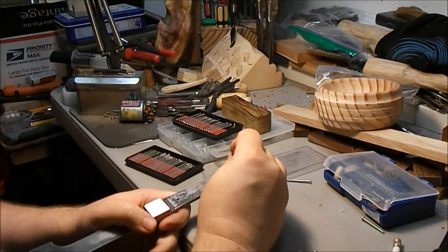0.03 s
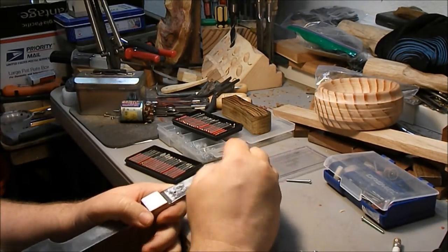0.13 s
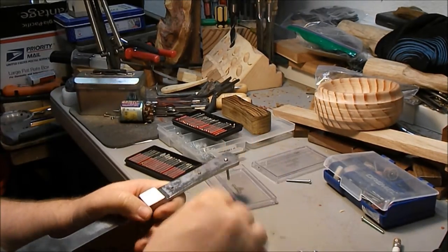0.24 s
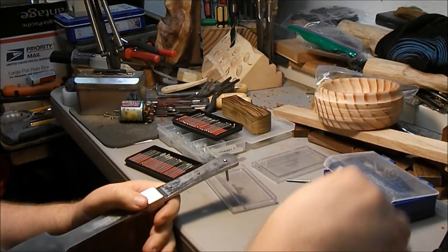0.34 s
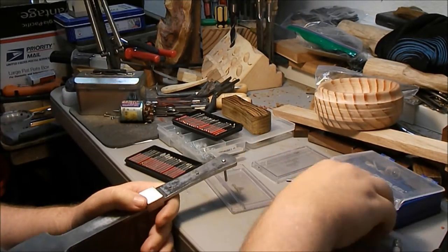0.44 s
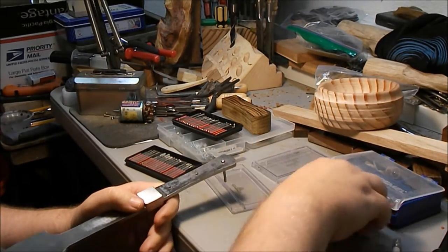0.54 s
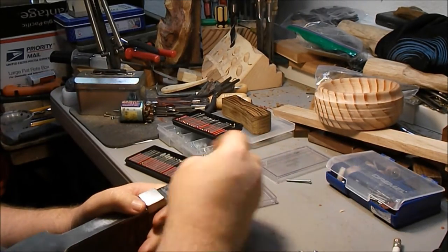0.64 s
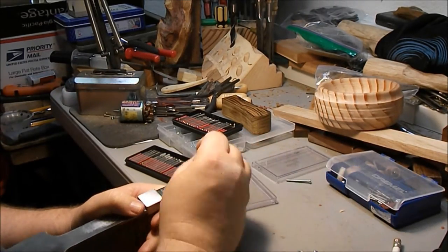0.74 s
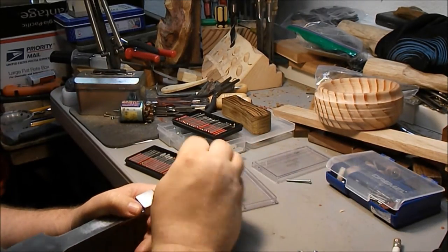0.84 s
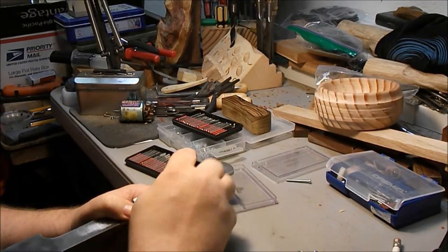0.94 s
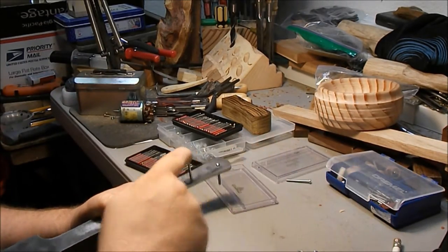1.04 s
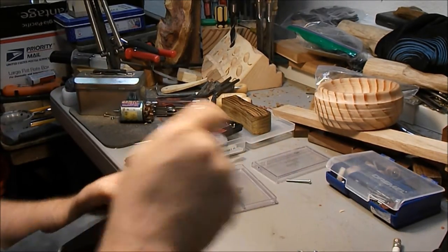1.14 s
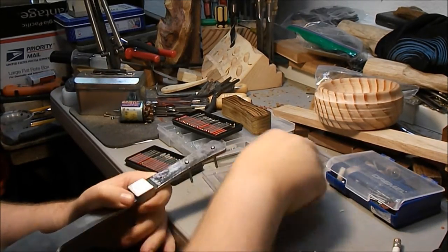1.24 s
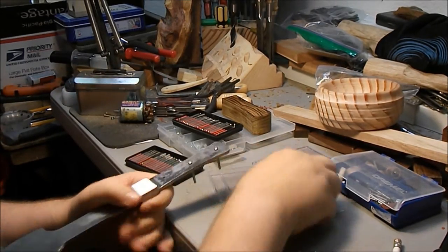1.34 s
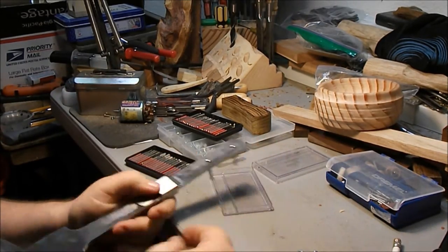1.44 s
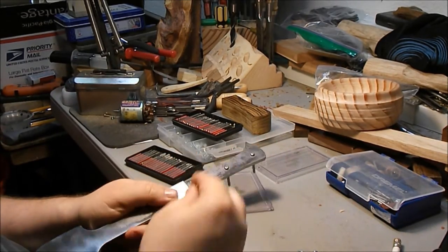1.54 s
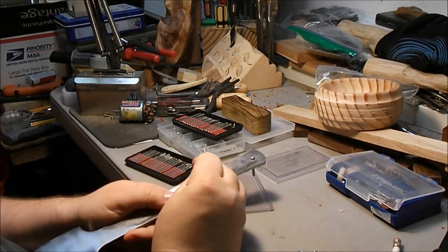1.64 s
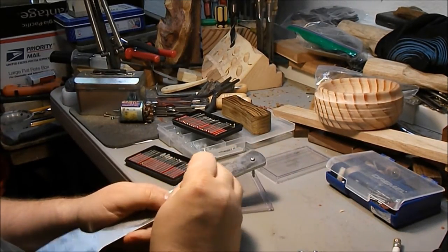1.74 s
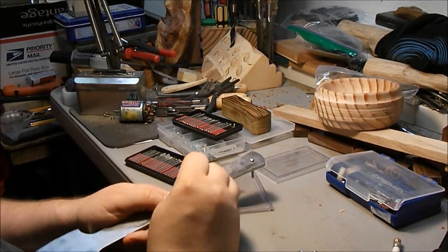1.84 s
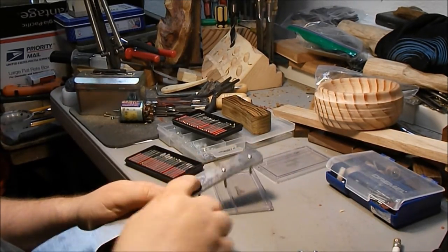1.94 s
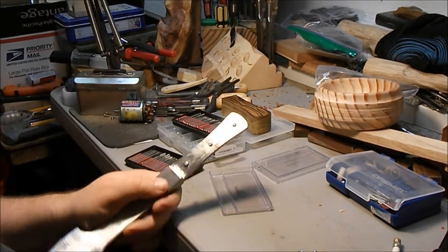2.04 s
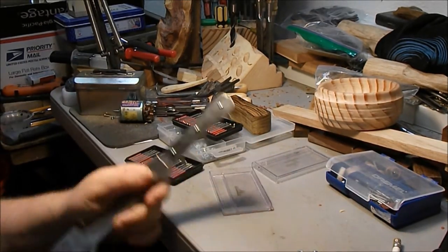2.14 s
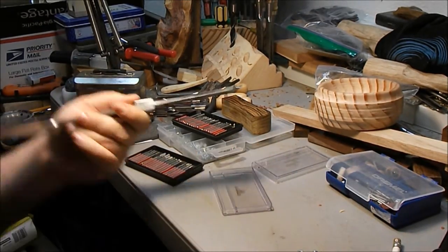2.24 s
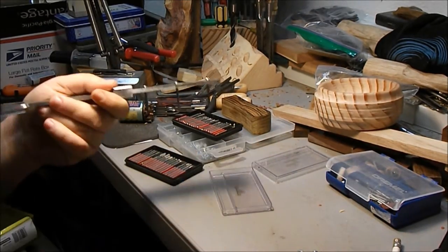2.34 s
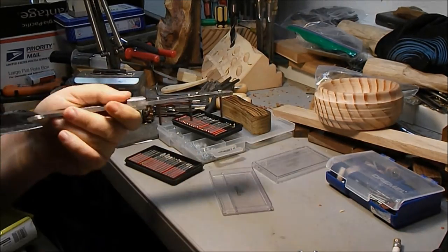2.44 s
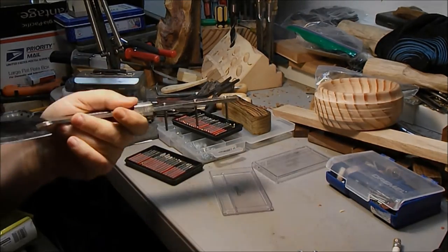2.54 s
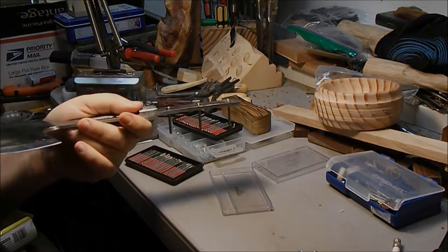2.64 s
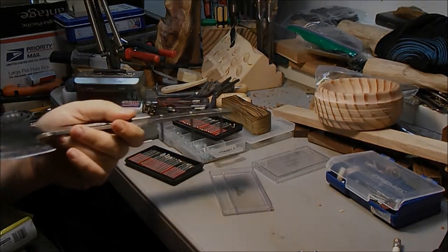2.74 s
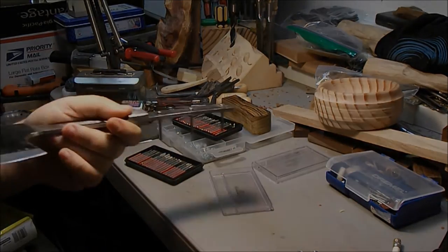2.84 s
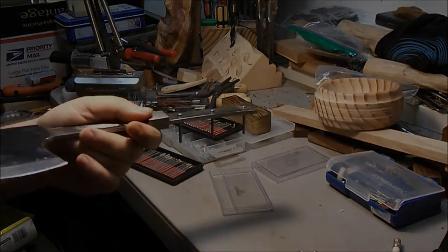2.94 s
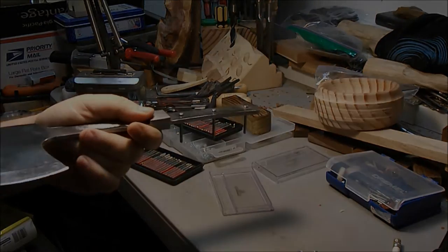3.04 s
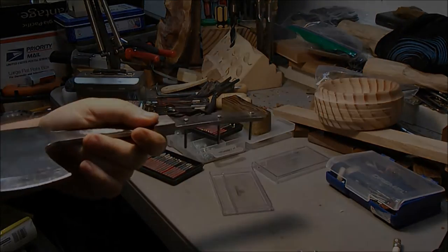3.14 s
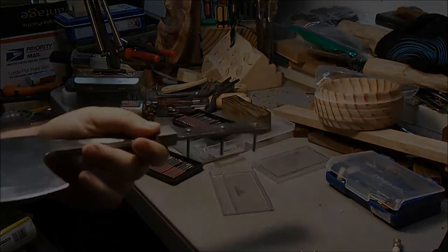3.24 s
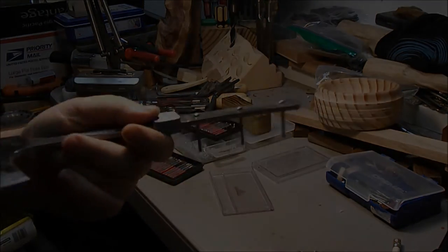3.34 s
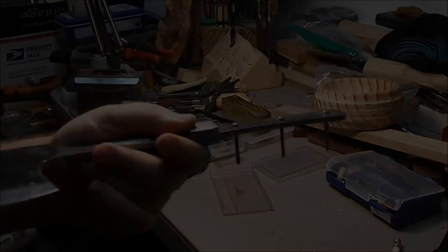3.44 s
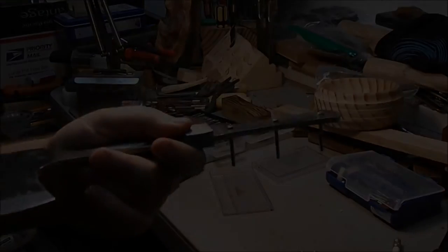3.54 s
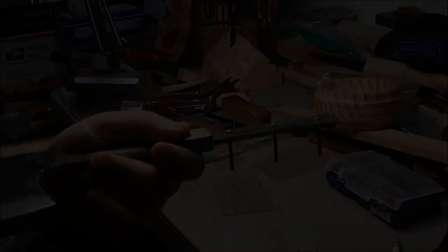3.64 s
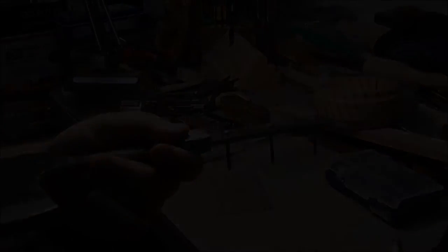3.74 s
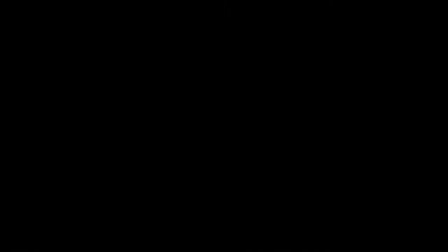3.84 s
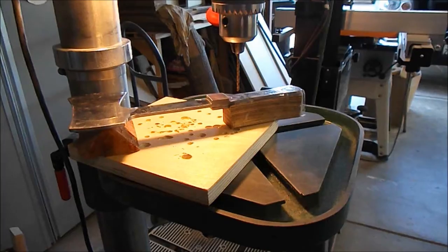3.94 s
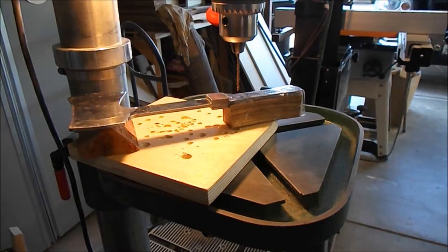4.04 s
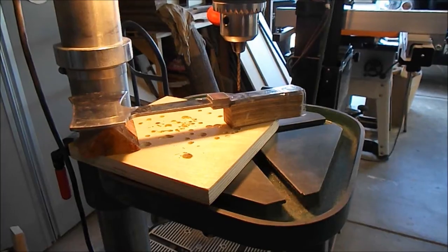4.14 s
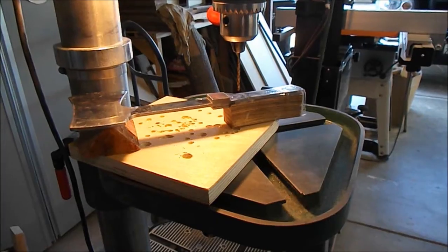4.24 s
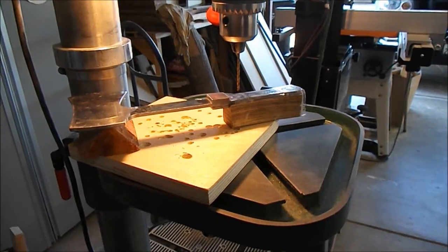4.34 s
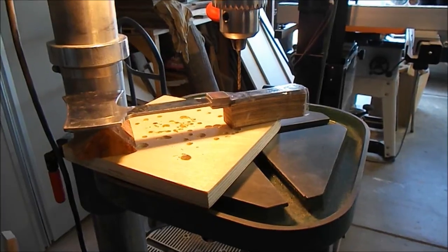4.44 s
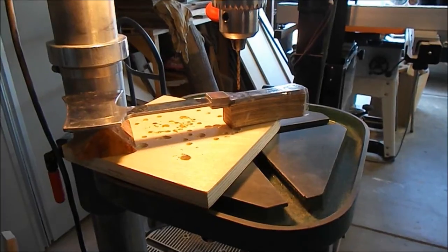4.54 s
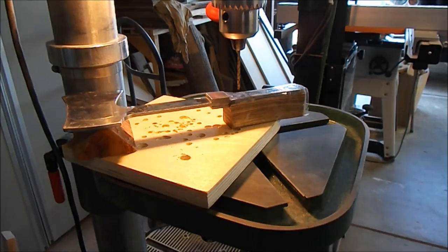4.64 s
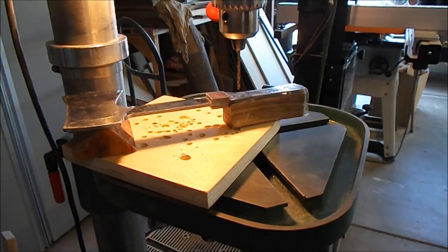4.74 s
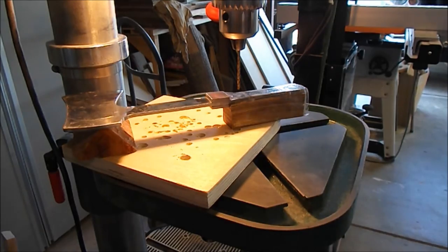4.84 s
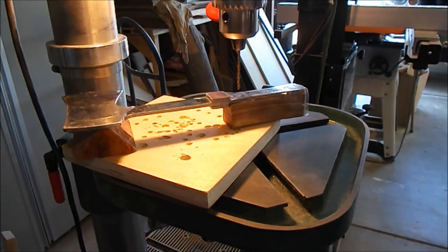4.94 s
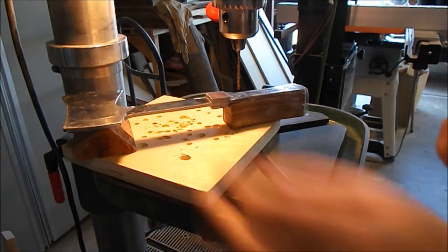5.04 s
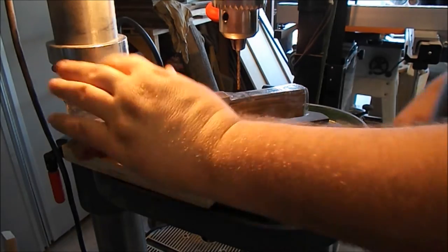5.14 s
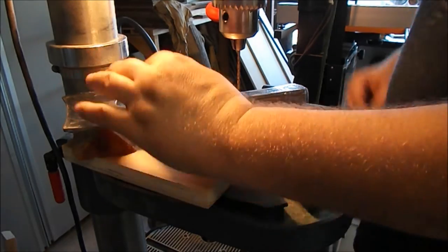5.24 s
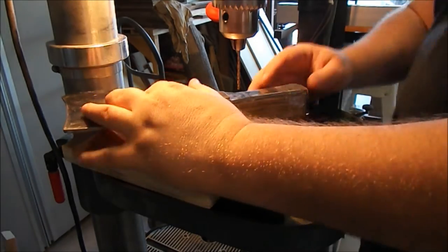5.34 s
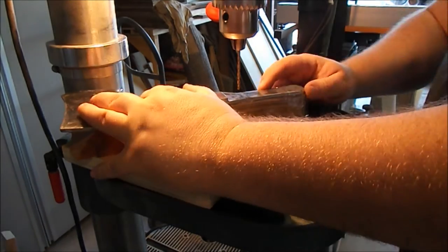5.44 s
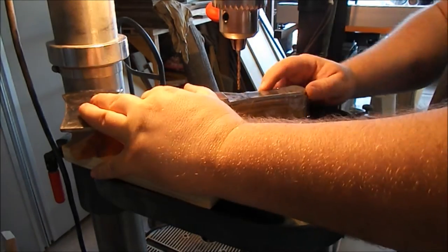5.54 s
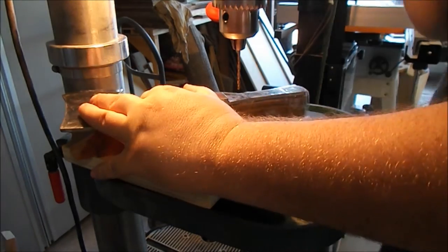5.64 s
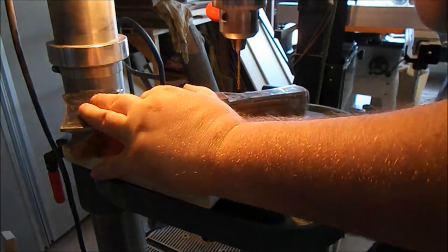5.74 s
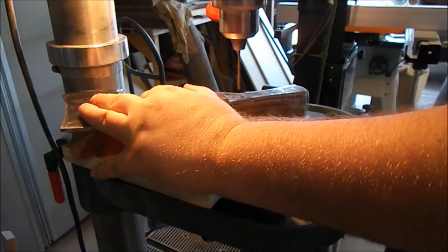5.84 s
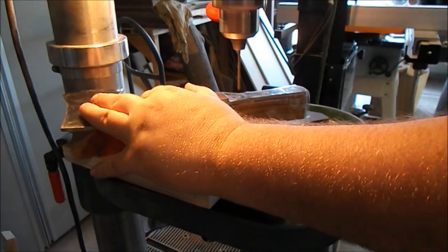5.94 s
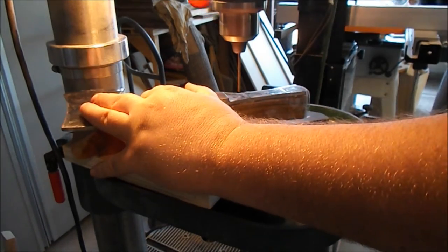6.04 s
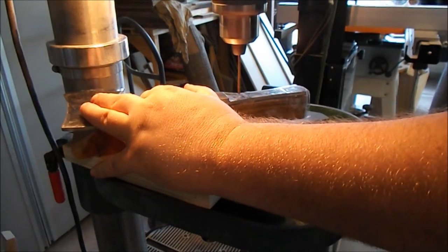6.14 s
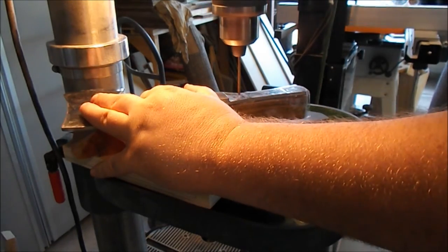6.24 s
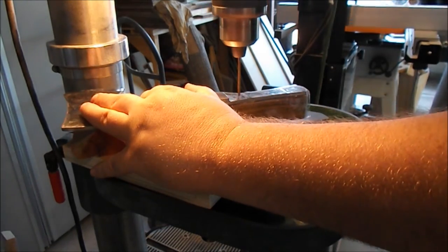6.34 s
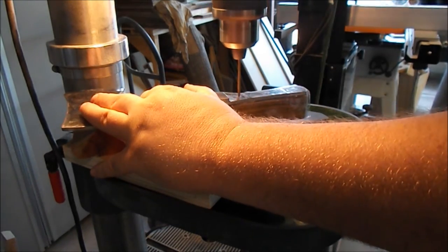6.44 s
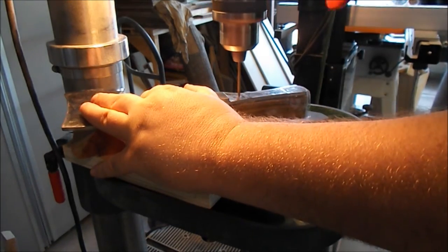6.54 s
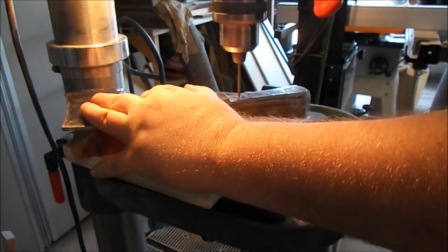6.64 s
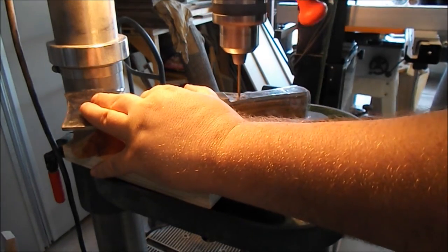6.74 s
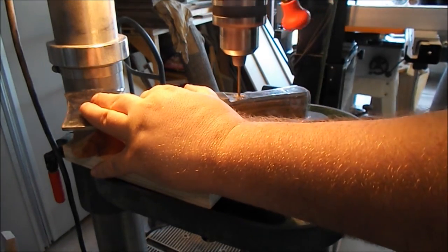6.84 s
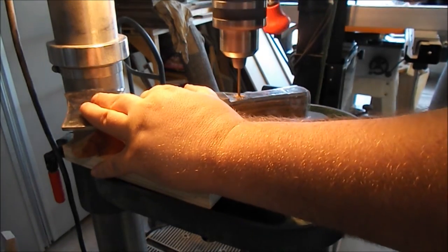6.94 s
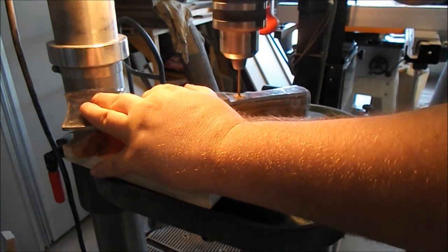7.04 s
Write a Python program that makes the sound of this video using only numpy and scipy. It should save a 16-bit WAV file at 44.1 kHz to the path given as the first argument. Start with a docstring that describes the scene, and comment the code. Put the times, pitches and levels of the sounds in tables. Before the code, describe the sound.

Close, dry metal ticks, scrapes and bright screw jingles, soft handling, then a drill press starts with a clunk and gritty cutting.

```python
"""Bench handling and a drill press

In a home workshop, small screws jingle in the holes of a steel knife tang and a hand scrapes for more: noisy
contacts excite decaying steel modes, and coloured noise makes scrapes, soft bands, ticks and knocks.
At a drill press, ticks and a clink precede the switch: motor lines hum and whine, modulated noise makes belt
and spindle rattle, and gritty pulsed noise is the thin bit cutting metal. Hiss and a small room lie behind.
"""
import sys
import numpy as np
from scipy import signal
from scipy.fft import rfft, irfft, next_fast_len
from scipy.io import wavfile
from scipy.ndimage import map_coordinates

SR = 44100
rng = np.random.default_rng(int(sys.argv[2]) if len(sys.argv) > 2 else 0)


def master(y):
    """Save y as 16-bit WAV."""
    cut = np.clip(np.atleast_2d(y).T, -1, 1)
    pcm = np.round(cut * 32767)  # scale
    wavfile.write(sys.argv[1], SR, pcm.astype(np.int16))


N = 312669

# Spectrum of belt and spindle rattle: (frequency [Hz], relative level [dB])
RATTLE_SPECTRUM = [(150, -62), (300, -70), (450, -31), (650, -30.5), (800, -20), (1150, -8.5), (1350, -9),
                   (1570, -9.5), (1800, -7), (2250, -7.5), (2700, -3.5), (3600, -0.5), (5000, -4),
                   (9000, -20.5)]
# Spectrum of belt hiss: (frequency [Hz], relative level [dB])
BELT_SPECTRUM = [(400, -68), (3000, -22), (6000, 8), (7100, 3), (8200, 7.5), (9200, 5.5), (10000, 2),
                 (12500, 4), (15000, 3.5), (16500, -14)]
# Resonances of the sheet-metal guard and casting: (frequency [Hz], width [Hz], rms level [dB])
GUARD_RESONANCES = [(800, 48, -68), (893, 45, -66), (1079, 42, -54.5), (1950, 190, -53.5),
                    (3150, 225, -47.5), (3510, 255, -50), (4340, 80, -56), (5620, 48, -57), (9065, 96, -56)]
# The guard sings out as the belt takes up and grips: (time [s], level [dB])
GUARD_SURGES = [(5.90, -35.5), (6.085, -36), (6.108, -38), (6.155, -36)]
# Spectrum of chips torn off by the bit: (frequency [Hz], relative level [dB])
CHIP_SPECTRUM = [(300, -62), (1200, -37.5), (3500, -5), (5400, 10), (7000, -1), (10000, -7), (15500, -6)]
# Magnetic hum: (multiple of HUM_HZ [1], mean level [dB])
HUM_LINES = [(1, -60), (3, -51.5), (4, -58.5), (5, -48.5), (6, -56.5), (7, -52)]
# Rotor whine and sidebands: (multiple of SHAFT_HZ [1], multiples of HUM_HZ added [1], mean level [dB])
WHINE_LINES = [(34, -2, -54), (33, -1, -42), (34, -1, -42), (34, 0, -54), (34, 1, -53.5), (34, 2, -47.5),
               (34, 3, -50), (68, -1, -57), (68, 0, -52.5)]
# A screw chatters in its hole: (time [s], ring level [dB], length [s], firmness of hold [0-1])
SCREW_JINGLES = [(0.182, -49, .003, 0.8), (0.232, -39, 0.018, 0.76), (0.953, -44.5, .004, 0.73),
                 (1.153, -39.5, .0022, .9), (1.171, -34, 0.0088, 0.94), (1.183, -43, .007, .85),
                 (1.749, -44.5, 0.0044, 0.2), (1.814, -48.5, .005, .15), (1.949, -38, .004, .2),
                 (1.982, -32, 0.013, 0.3), (2.011, -32, 0.0067, .05), (2.016, -25, 0.0099, 0.02),
                 (2.033, -22, 0.0098, .15)]
# Modes of screw and tang when free: (frequency [Hz], relative level [dB], t60 [s])
STEEL_MODES = [(5270, -28, .05), (7650, -19, .04), (8608, -19, .035), (10600, -9, .055), (10800, -17, .03),
               (15050, -14, .05), (15320, -7, .05), (15510, 0, .05)]
# Steel set against the press, then its switch: (time [s], level [dB])
PRESS_CLINKS = [(5.7553, -26.5), (5.853, -22)]
# Modes of the press parts: (frequency [Hz], mean relative level [dB], t60 [s])
CLINK_MODES = [(4180, 6.5, 0.037), (4800, -5, .015), (7340, -2, 0.02), (8150, -2, 0.03),
               (13000, -15, 0.022), (14800, -6, .013)]
# Radiation of small bare steel parts: (frequency [Hz], gain [dB])
SMALL_STEEL_GAIN = [(100, -37), (500, -35), (2000, -16), (4000, -10), (8000, -4.5), (16000, 0)]
# Small hard contacts: (time [s], rms level [dB], brightness [dB per octave])
HARD_TICKS = [(.2505, -30, 1), (1.1761, -23.5, 0), (1.4360, -23.5, -1.5), (1.4600, -31, -.5),
              (1.485, -40, -4), (1.5113, -28.5, -1), (3.8569, -40.5, -9), (4.0328, -34, -4),
              (4.2383, -32, 0), (4.2639, -28.5, 1), (4.2877, -39.5, -4.5), (4.3316, -29, 2),
              (4.4883, -39, 3), (4.5398, -31.5, 0), (5.151, -46.5, -3), (5.1582, -41.5, -5),
              (5.789, -39, -6.5), (5.8511, -17.5, -4), (5.9167, -29, -1), (6.9475, -26.5, -8)]
# Spectrum of a tick before its brightness: (frequency [Hz], relative level [dB])
TICK_SPECTRUM = [(300, -50), (1500, -26), (3200, -14), (4300, -8.5), (5300, -15), (8000, -4.5),
                 (12000, 0.5), (15500, 5), (17000, -23)]
# Dull knocks as the knife turns in the hand: (time [s], rms level [dB], half length [s])
HAND_KNOCKS = [(2.681, -43.5, 0.0038), (2.867, -44, .001), (3.084, -45.5, 0.0049)]
# Spectrum of a knock: (frequency [Hz], relative level [dB])
KNOCK_SPECTRUM = [(80, -40), (250, -12.5), (450, -7), (650, -0.5), (1150, -1), (1800, -7.5), (2600, -24),
                  (6000, -60)]
# Fingers and screws scrape bench and drill table: (time [s], peak of the rms level [dB], rise [s])
GRITTY_SCRAPES = [(.333, -42, .006), (.540, -39, .005), (0.563, -38.5, 0.0073), (0.585, -24, 0.0012),
                  (.619, -34, .001), (.665, -27.5, 0.0053), (1.379, -30, .002), (1.414, -31.5, 0.0056),
                  (1.426, -33, 0.0046), (1.459, -31, 0.0067), (5.265, -44, 0.0081), (5.475, -51, 0.0054)]
# Spectrum of a scrape: (frequency [Hz], relative level [dB])
SCRAPE_SPECTRUM = [(290, -52), (500, -29), (1060, -20.5), (1600, -11.5), (1870, -12), (4730, -5),
                   (7420, -4), (12700, -3), (16000, 0)]
# Soft bands of noise: slides, a squeak, low rustle, a hiss swell, the body of screw jingles and clicks:
# (time [s], level [dB], t60 [s], centre [Hz], width [Hz])
SOFT_BANDS = [(1.174, -32, 0.041, 8400, 800), (1.55, -50, 0.43, 10900, 5950), (1.87, -59, 1, 10100, 900),
              (2.47, -54.5, 1.2, 10100, 4000), (2.908, -52, .1, 2390, 250), (2.912, -47.5, 0.1, 9600, 700),
              (2.93, -70, .45, 400, 700), (3.09, -66, 0.45, 450, 800), (3.42, -59.5, 2.2, 5800, 1610),
              (4.033, -45.5, 0.018, 1900, 500), (4.033, -44.5, 0.018, 4350, 700),
              (4.72, -60, 0.36, 3300, 1250), (5.41, -58, 0.43, 15500, 4000),
              (5.758, -38, 0.017, 4700, 1500), (5.790, -42, .025, 4900, 1500),
              (5.846, -50, 0.14, 4600, 4000)]
# Steady hiss at the bench: (frequency [Hz], relative level [dB])
BENCH_SPECTRUM = [(250, -37.5), (360, -30), (420, -18), (1000, -9), (1600, -9.5), (2200, -1), (2800, 0.5),
                  (3900, -1.5), (5700, 1.5), (8300, -3), (11000, -3.5), (12600, 0), (14000, -6.5),
                  (16000, -5.5)]
# Low rustle at the bench: (frequency [Hz], relative level [dB])
RUSTLE_SPECTRUM = [(100, -43), (340, -15), (430, 2), (850, 3), (1500, -1), (3000, -12.5)]
# Faint wavering hum at the bench: (frequency [Hz], mean level [dB])
BENCH_HUM_LINES = [(203, -101), (406, -92.5), (610, -90.5), (820, -83), (1230, -82)]
# Steady hiss at the press: (frequency [Hz], relative level [dB])
PRESS_SPECTRUM = [(150, -40), (270, -17), (550, -13), (900, -12.5), (1800, -10), (2600, -6), (2950, -1.5),
                  (3600, -3), (5800, -8), (6900, -4.5), (8000, -9.5), (11000, -9.5), (12800, -6),
                  (14200, -8.5), (16000, -7.5)]
# Decay of the room: (frequency [Hz], t60 [s])
ROOM_DECAY = [(200, 0.13), (2000, 0.064), (15000, 0.055)]
# Stereo phase: (frequency [Hz], lead of the right channel [rad])
RIGHT_LEAD = [(2500, 0), (5000, 0), (10000, 0.27), (14500, .45), (16000, .5)]
# Diffuse treble: (frequency [Hz], side gain [dB])
SIDE_GAIN = [(2000, -63), (4400, -46.5), (8000, -24.5), (15000, -10)]

START_S, SETTLE_S = 5.853, 0.22  # the press is switched on; time constant of its settling (s)
HUM_HZ, SHAFT_HZ = 479.85, 119.18
WAVER_DB = 1.25  # how far each motor line wavers (dB)
RATTLE_DB, RATTLE_START_DB, RATTLE_LOAD_DB = -37.5, 6, 1.5  # idling, more at the start, more at full feed (dB)
BELT_DB, BELT_SLIP_DB, BELT_LOAD_DB = -39, 7, 1.1  # idling, more while slipping, more at full feed (dB)
GRIP_S, GRIP_FADE_S = 6.085, 0.02  # the belt grips; time scale on which its slip ends (s)
SLIP_HZ, SLIP_WIDTH_HZ, SLIP_DB = 9220, 600, -40.5  # narrow song of the slipping belt
BUZZ_HZ, BUZZ_WIDTH_HZ = 1424, 80
BUZZ_DB, BUZZ_START_DB = -49.5, 5.5  # guard buzz: idling, more at the start (dB)
SURGE_HZ, SURGE_HALF_S = 1437, 0.014  # pitch and half length of a guard surge
BITE_S, BITE_RISE_S, EASE_S, EASE_FALL_S = 6.62, 0.19, 6.96, 0.045  # the bit is fed in, held, then eased (s)
EASED_FEED, CUT_DB = 0.54, -33.5  # share of the feed that is kept; mean chip level at full feed (dB)
CONTACT_DB = -27  # contact noise of a free screw, against its ring (dB)
HELD_CONTACT_DB, HELD_DULL_DB = 28.5, 19  # full hold: more contact noise (dB), tilt to low modes (dB per octave)
HELD_RING = .55  # factor on the mode t60 at full hold
TICK_HALF_S, TILT_FROM_HZ = .0008, 2000  # half length of a tick; its brightness acts above this frequency
SCRAPE_T60_S = 0.067
SOFT_RISE = 0.13  # rise time constant of a soft band, as a share of its t60
MOVE_S = 4.043  # the scene moves from bench to press (s)
BENCH_DB, RUSTLE_DB, PRESS_DB = -51.5, -74, -57.5  # base levels: bench hiss, bench rustle, press hiss (dB)
SWELL_DB, SWELL_S, SWELL_HALF_S = 2.0, 2.63, 0.71  # bench hiss swells: height (dB), middle, half length (s)
TOP_HZ = 15950  # band limit


def amp(db):
    """Logarithmic level: decibels become an amplitude ratio."""
    return 10 ** (np.asarray(db) / 20)


def unit(x):
    """Normalization: the mean square becomes 1."""
    return x / np.sqrt(np.mean(x ** 2) + 1e-20)


def clock():
    """Uniform sampling: the time of each sample in seconds."""
    return np.arange(N) / SR


def along(points, hz):
    """Logarithmic interpolation of (frequency, value) points."""
    f, v = np.transpose(points)
    return np.interp(np.log(hz + 1), np.log(f + 1), v)


def wobble(rate):
    """Slow random fluctuation: a smooth curve through random knots, rate of them a second."""
    knots = rng.standard_normal(int(N * rate / SR) + 4)
    return map_coordinates(knots, [clock() * rate])


def filtered(x, response):
    """Linear filtering: the spectrum is multiplied by a response of frequency."""
    n = x.shape[-1]
    m = next_fast_len(n + 8192)
    spectrum = rfft(x, m) * response(np.fft.rfftfreq(m, 1 / SR))
    return irfft(spectrum, m)[..., :n]


def noise(spectrum, grain_db=0):
    """Spectral shaping of noise to rms 1; grain_db gathers it into tiny bursts."""
    source = rng.standard_normal(N) * amp(grain_db * wobble(1500))
    return unit(filtered(source, lambda hz: amp(along(spectrum, hz))))


def resonance(hz, centre, width):
    """Damped oscillator: the causal response of one resonance."""
    return 1j * hz * width / (centre ** 2 - hz ** 2 + 1j * hz * width)


def band(centre, width):
    """Resonant filtering: noise of rms 1 through two equal resonances in series."""
    return unit(filtered(rng.standard_normal(N), lambda hz: resonance(hz, centre, width) ** 2))


def thin(x):
    """Radiation efficiency: small steel parts radiate hardly any bass."""
    return filtered(x, lambda hz: amp(along(SMALL_STEEL_GAIN, hz)))


def opens(s, rise):
    """Exponential approach: a gate that opens smoothly from time s."""
    return 1 - np.exp(-np.maximum(clock() - s, 0) / rise)


def swell(s, rise, t60):
    """Exponential growth and decay: an envelope that peaks at time s."""
    t = clock() - s
    return np.exp(np.minimum(t, 0) / rise) * amp(-60 * np.clip(t / t60, 0, 4))


def bump(s, half):
    """Gaussian envelope: a smooth hill of height 1 around time s."""
    return np.exp(-((clock() - s) / half) ** 2)


def add(track, s, sound):
    """Superposition: a sound is summed into the track from time s."""
    part = track[round(s * SR):][:len(sound)]
    part += sound[:len(part)]


def feed():
    """Applied load: pressure on the bit, 0-1, rises, holds, then eases."""
    ramp = lambda s, length: np.clip((clock() - s) / length, 0, 1)
    eased = (1 - EASED_FEED) * ramp(EASE_S, EASE_FALL_S)
    return ramp(BITE_S, BITE_RISE_S) * (1 - eased)


def drive():
    """Amplitude modulation and resonance: belt and bearings rattle once a turn and the guard resonates."""
    unsettled = 1 - opens(START_S, SETTLE_S)
    slipping = .5 - .5 * np.tanh((clock() - GRIP_S) / GRIP_FADE_S)
    turn = np.sin(2 * np.pi * SHAFT_HZ * clock())

    rattle_db = RATTLE_DB + RATTLE_START_DB * unsettled + RATTLE_LOAD_DB * feed() + 1 * turn
    rattle = amp(rattle_db) * noise(RATTLE_SPECTRUM, grain_db=2.5) * opens(START_S, 0.0049)
    belt_db = BELT_DB + BELT_SLIP_DB * slipping + BELT_LOAD_DB * feed() + 0.96 * turn + 1.3 * wobble(150)
    belt = amp(belt_db) * noise(BELT_SPECTRUM, grain_db=1.5) * opens(START_S, 0.00093)

    guard = sum(amp(db) * band(centre, width) for centre, width, db in GUARD_RESONANCES)
    buzz = amp(BUZZ_DB + BUZZ_START_DB * unsettled) * band(BUZZ_HZ, BUZZ_WIDTH_HZ)
    surges = sum(amp(db) * bump(s, SURGE_HALF_S) for s, db in GUARD_SURGES)
    song = surges * np.sqrt(2) * np.sin(2 * np.pi * SURGE_HZ * clock())

    slip = amp(-24.5) * swell(5.875, 0.021, 0.061) * band(3100, 1500)
    slip += amp(SLIP_DB) * slipping * band(SLIP_HZ, SLIP_WIDTH_HZ)
    crackle = thin(noise([(100, 1), (16000, 0)], grain_db=7))
    jolt = amp(-17.5) * swell(5.856, 0.0014, 0.048) * (crackle + 0.36 * band(6480, 500))
    return rattle + belt + jolt + opens(START_S, 0.011) * (guard + buzz + song + slip)


def cutting():
    """Chip formation: the bit tears off metal in gritty, uneven pulses, as loud as it is fed hard."""
    pulse_hz = 131 * (1 + 0.081 * wobble(15))
    bite_db = 2 * np.sin(2 * np.pi * np.cumsum(pulse_hz) / SR)
    return feed() * amp(CUT_DB + bite_db) * noise(CHIP_SPECTRUM, grain_db=4.5)


def motor():
    """Magnetic forces: field harmonics hum first; rotor lines with hum sidebands fade in just after."""
    field = 2 * np.pi * HUM_HZ * clock()
    shaft = 2 * np.pi * np.cumsum(SHAFT_HZ * (1 + 0.000344 * wobble(8))) / SR

    def line(phase, db):
        """Spectral line: a sinusoid of random starting phase and wavering level."""
        level = np.sqrt(2) * amp(db + WAVER_DB * wobble(18))
        return level * np.sin(phase + rng.uniform(0, 2 * np.pi))

    hum = sum(line(round(k) * field, db) for k, db in HUM_LINES)
    whine = sum(line(round(bars) * shaft + round(k) * field, db) for bars, k, db in WHINE_LINES)
    return opens(START_S + 0.015, 0.007) * hum + opens(START_S + 0.054, 0.045) * whine


def screws():
    """Modal excitation: chattering contacts of screw and tang feed shared modes, damped by a firm hold."""
    out, t = np.zeros(N), np.arange(SR // 8) / SR
    for s, db, length, held in SCREW_JINGLES:
        dull_db, contact_db = HELD_DULL_DB * held, CONTACT_DB + HELD_CONTACT_DB * held
        chatter = amp(-60 * np.maximum(t - length, 0) / 0.01) * (1 - np.exp(-t / 0.00061))
        strengths = amp(3.3 * rng.standard_normal(len(t)))
        contacts = rng.standard_normal(len(t)) * strengths * chatter
        ring = np.zeros(len(t))
        for hz, level, t60 in STEEL_MODES:
            decay = amp(-60 * t / (t60 * HELD_RING ** held))
            mode = signal.fftconvolve(contacts, np.sin(2 * np.pi * hz * t) * decay)[:len(t)]
            octaves_down = min(np.log2(STEEL_MODES[-1][0] / hz), 1)
            ring += amp(level + dull_db * octaves_down) * unit(mode)
        # the energy lies in the chatter and the first moments of the ring
        sounding = np.sqrt((length + .005) / t[-1])
        add(out, s, amp(db) * sounding * (ring + amp(contact_db) * unit(contacts)))
    return thin(out)


def clinks():
    """Impact and free vibration: a noisy crack and the short ring of the steel press parts."""
    out, t = np.zeros(N), np.arange(SR // 8) / SR
    for s, db in PRESS_CLINKS:
        ring = np.zeros(len(t))
        for hz, level, t60 in CLINK_MODES:
            ring += amp(level + rng.normal(0, 1) - 60 * t / t60) * np.sin(2 * np.pi * hz * t)
        crack = 0.85 * amp(-60 * t / 0.012) * rng.standard_normal(len(t))
        add(out, s, amp(db) * (ring + crack))
    return thin(out)


def tap(s, db, length, colour, tilt_db=0):
    """Impact without ring: a brief noise burst around time s, brighter for a larger tilt."""
    out, half = np.zeros(N), SR // 32
    t = np.arange(-half, half) / SR
    burst = rng.standard_normal(len(t)) * np.exp(-(t / length) ** 2)

    def response(hz):
        """Spectral tilt: the colour plus a slope per octave."""
        octaves_up = np.log2(np.maximum(hz / TILT_FROM_HZ, 1))
        return amp(along(colour, hz) + tilt_db * octaves_up)

    # the level is the rms over twice the half length
    concentration = np.sqrt(length / t[-1])
    add(out, s + t[0], amp(db) * concentration * unit(filtered(burst, response)))
    return out


def taps():
    """Contact stiffness: sharp ticks of steel on steel, and dull knocks in the hand."""
    ticks = sum(tap(s, db, TICK_HALF_S, TICK_SPECTRUM, tilt_db) for s, db, tilt_db in HARD_TICKS)
    knocks = sum(tap(s, db, length, KNOCK_SPECTRUM) for s, db, length in HAND_KNOCKS)
    return ticks + knocks


def scrapes():
    """Dry friction: short gritty slides shape grainy noise."""
    pressure = sum(amp(db) * swell(s, rise, SCRAPE_T60_S) for s, db, rise in GRITTY_SCRAPES)
    return pressure * noise(SCRAPE_SPECTRUM, grain_db=3)


def soft_bands():
    """Band noise: slides, rustle, a hiss swell and click bodies, each in its own band; long ones rise slowly."""
    out = np.zeros(N)
    for s, db, t60, centre, width in SOFT_BANDS:
        out += amp(db) * swell(s, SOFT_RISE * t60, t60) * band(centre, width)
    return out


def air():
    """Stationary noise: hiss, low rustle and faint hum at the bench, a quieter hiss at the press."""
    hum = np.zeros(N)
    for hz, db in BENCH_HUM_LINES:
        hum += np.sqrt(2) * amp(db + 2.8 * wobble(6.04)) * np.sin(2 * np.pi * hz * clock())
    hiss_db = BENCH_DB + SWELL_DB * bump(SWELL_S, SWELL_HALF_S) + 0.39 * wobble(15)
    hiss = amp(hiss_db) * noise(BENCH_SPECTRUM, grain_db=1)
    bench = hiss + amp(RUSTLE_DB) * noise(RUSTLE_SPECTRUM) + hum
    press = amp(PRESS_DB + 0.49 * wobble(20)) * noise(PRESS_SPECTRUM, grain_db=1.5)
    # a narrow band of the hiss flutters
    flutter = band(2830, 500) * amp(3.9 * wobble(30))
    moved = opens(MOVE_S, .001)
    return (1 - moved) * (bench + amp(-66.0) * flutter) + moved * (press + amp(-73.5) * flutter)


def shop(x):
    """Reverberation: convolution with decaying noise, the short answer of a small, cluttered room."""
    hz, t, z = signal.stft(rng.standard_normal(SR // 4), SR, nperseg=256)
    decay = amp(-60 * t / along(ROOM_DECAY, hz)[:, None])
    tail = signal.istft(z * decay, SR, nperseg=256)[1]
    return signal.fftconvolve(x, tail / np.linalg.norm(tail))[:N]


def scene():
    """Direct and reverberant fields: handling is close and dry; the running press fills the room."""
    handling = screws() + scrapes() + soft_bands() + taps() + clinks()
    machine = drive() + cutting()
    steady = machine + air()
    room = shop(amp(-16.5) * handling + amp(-9.5) * machine)
    mid = handling + steady + motor() + room
    side = filtered(shop(steady), lambda hz: amp(along(SIDE_GAIN, hz)))

    def channel(sign):
        """Interchannel phase: treble is slightly out of step; left is 1, right is -1."""
        shifted = filtered(mid, lambda hz: np.exp(-.5j * sign * along(RIGHT_LEAD, hz)))
        return shifted + sign * side

    return np.array([channel(1), channel(-1)])


def record(dry):
    """Low-pass filtering: the response falls steeply above the band limit."""
    return filtered(dry, lambda hz: 1 / np.sqrt(1 + (hz / TOP_HZ) ** 200))


dry = scene()
out = record(dry)
master(out)
```